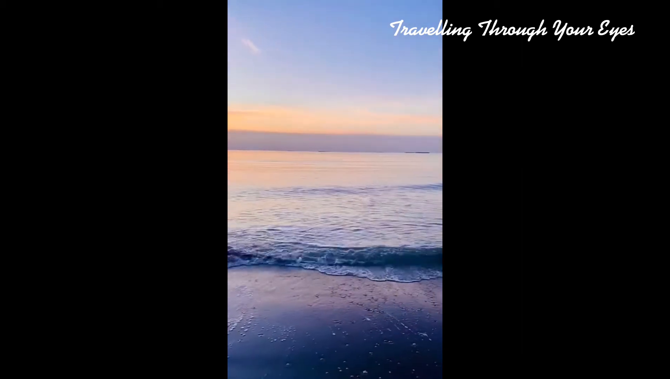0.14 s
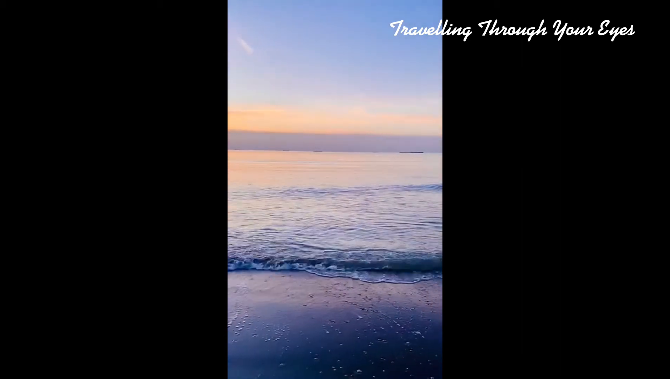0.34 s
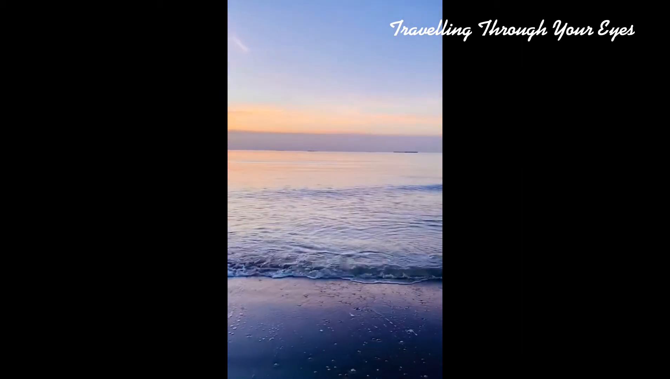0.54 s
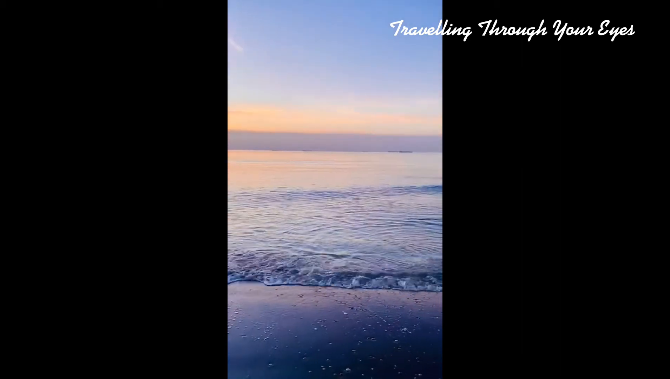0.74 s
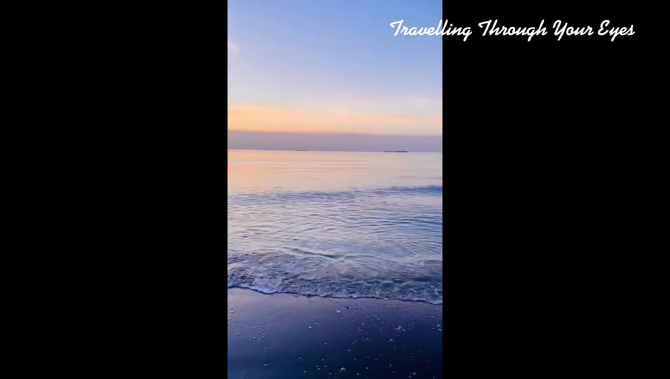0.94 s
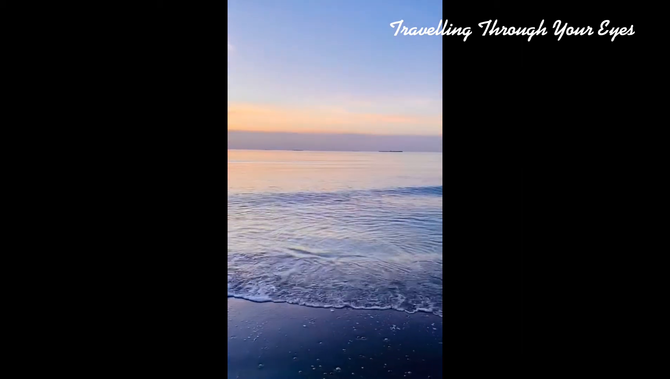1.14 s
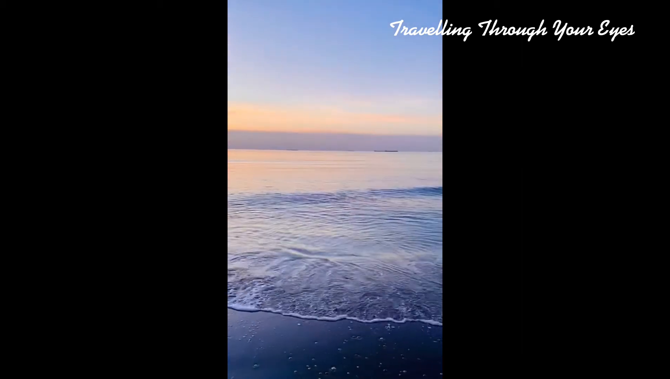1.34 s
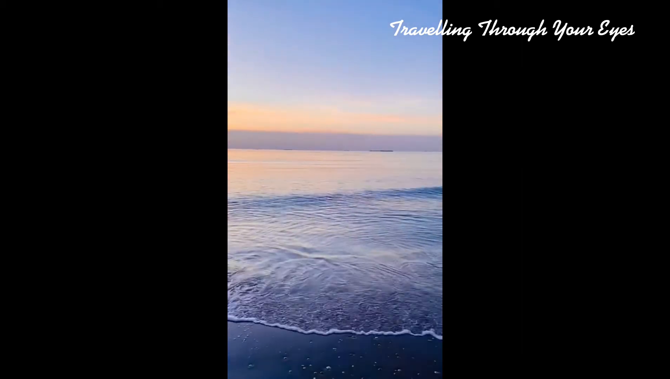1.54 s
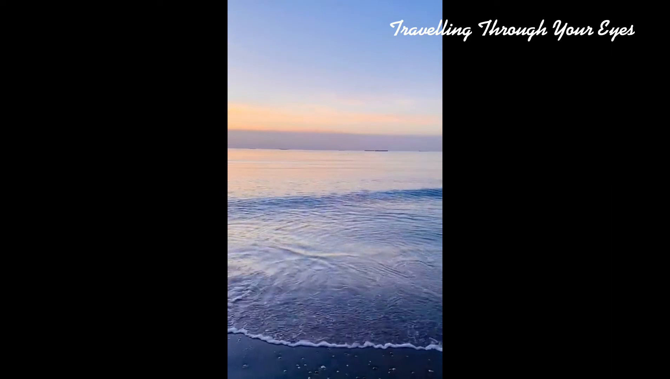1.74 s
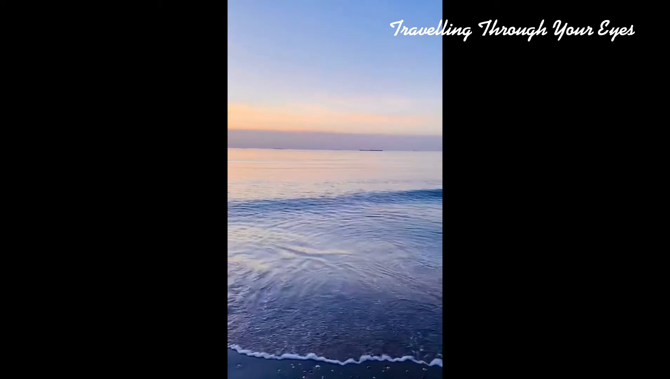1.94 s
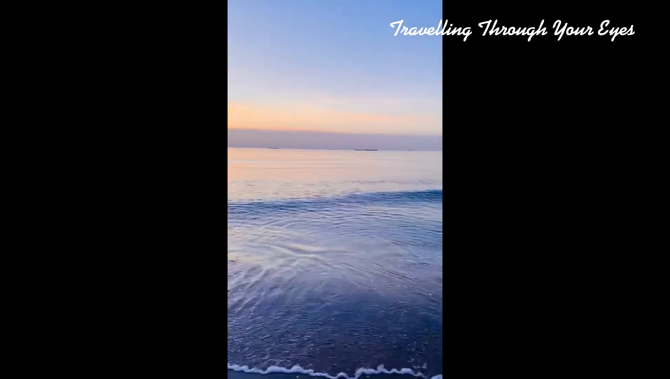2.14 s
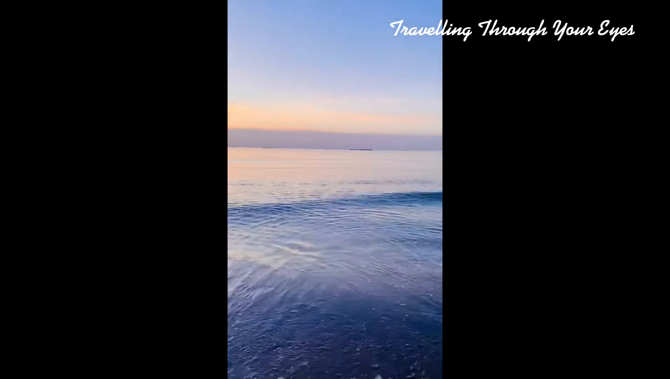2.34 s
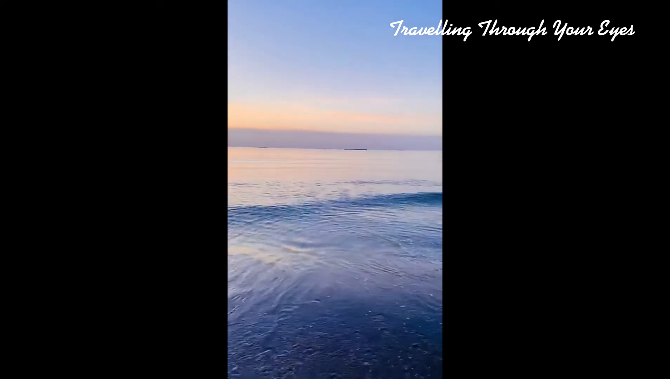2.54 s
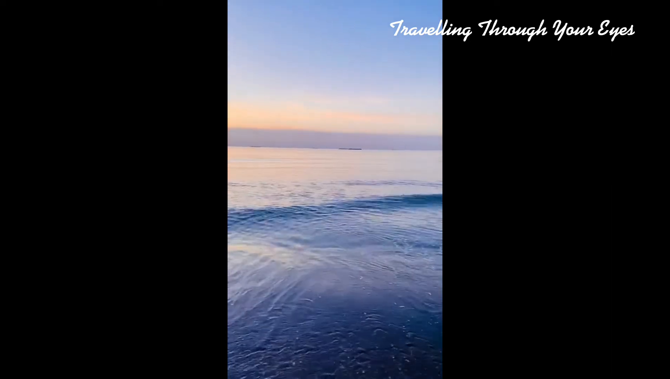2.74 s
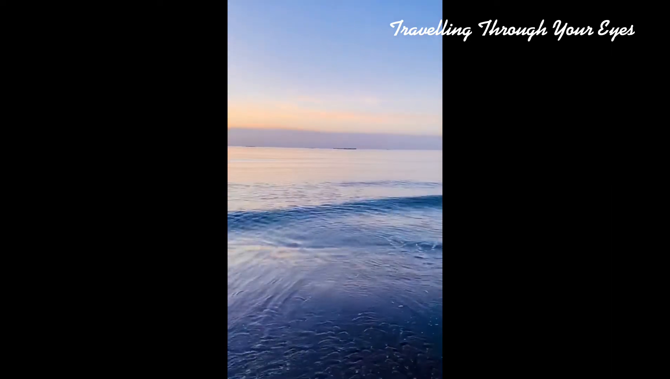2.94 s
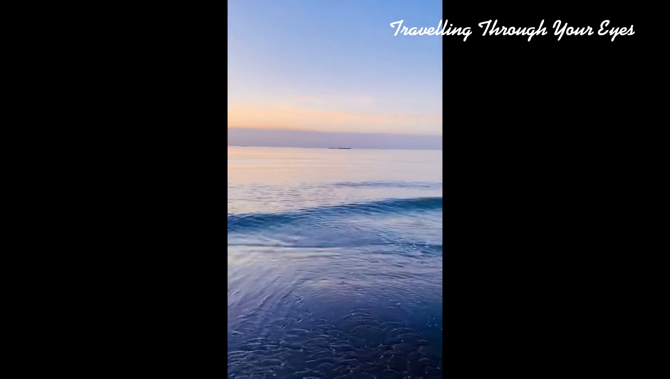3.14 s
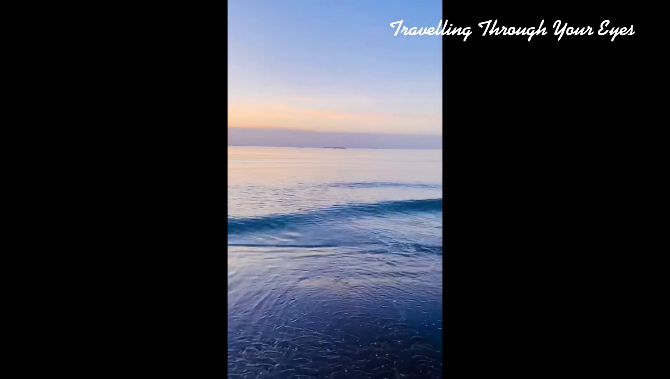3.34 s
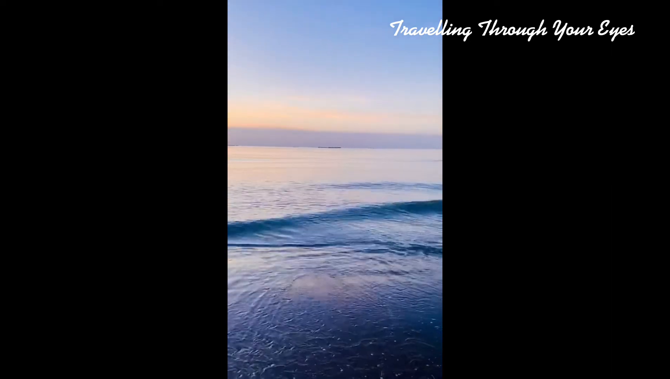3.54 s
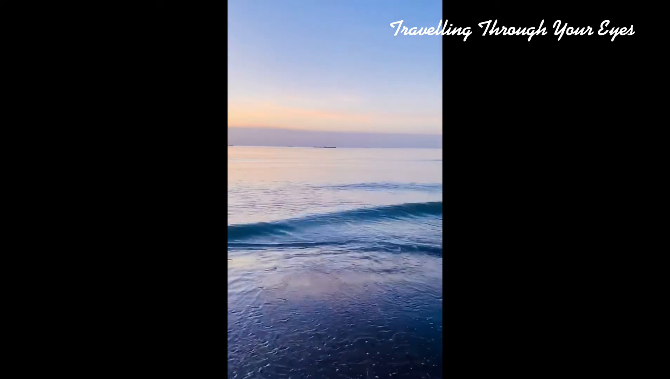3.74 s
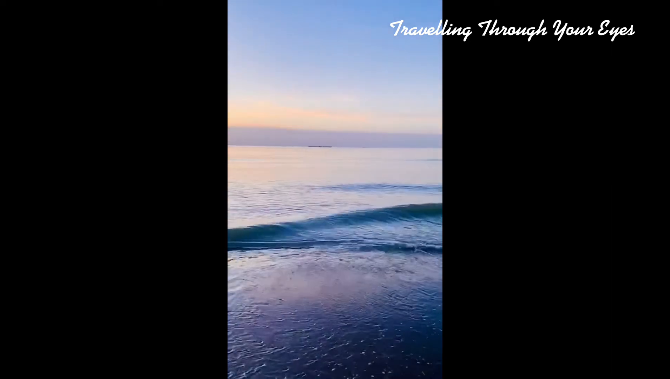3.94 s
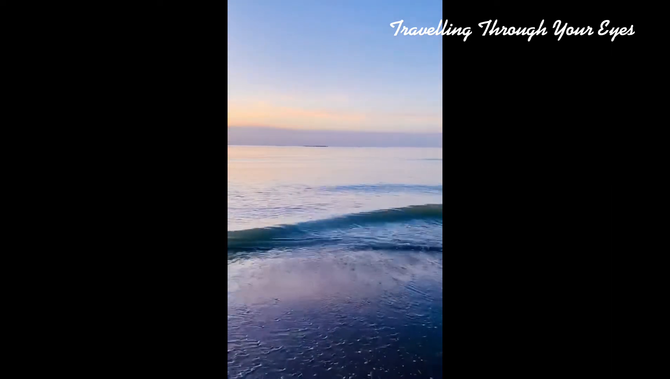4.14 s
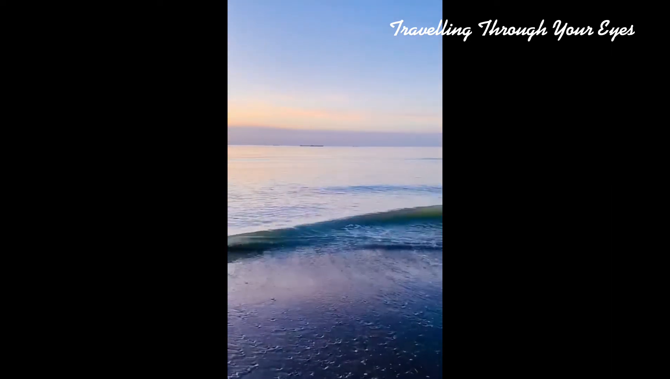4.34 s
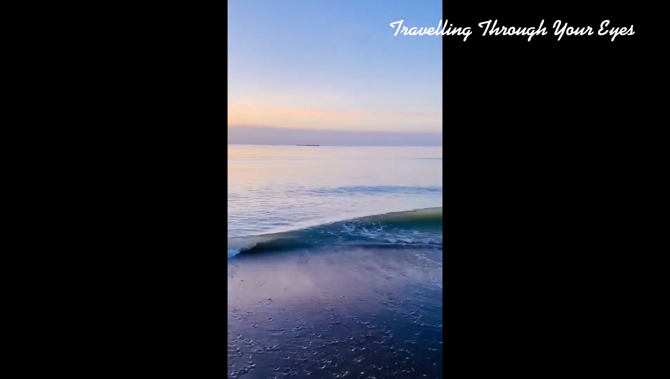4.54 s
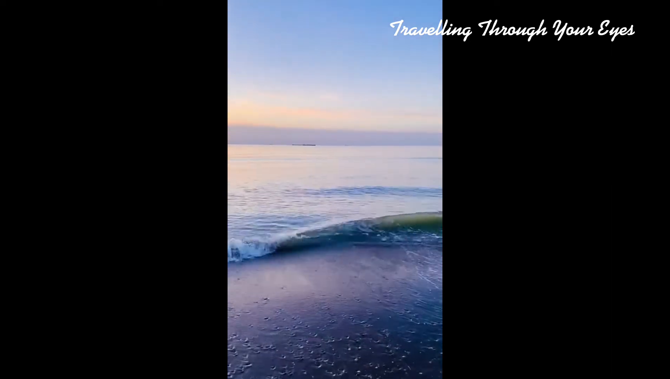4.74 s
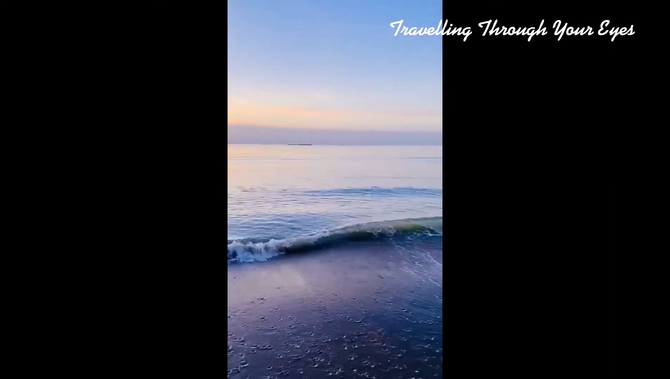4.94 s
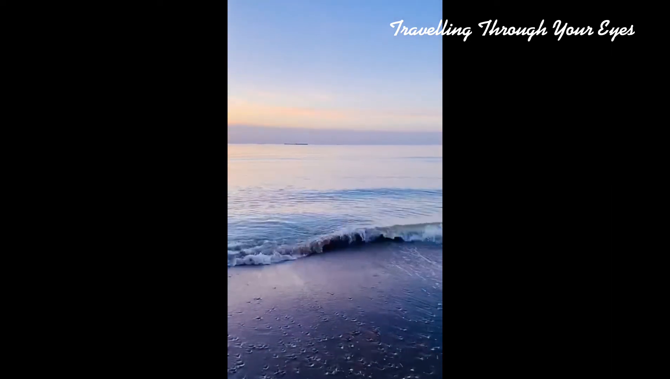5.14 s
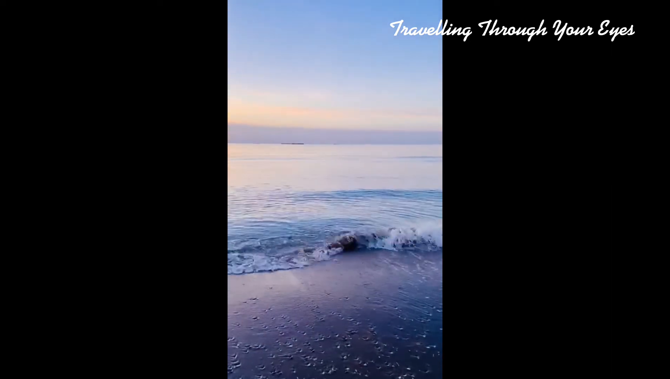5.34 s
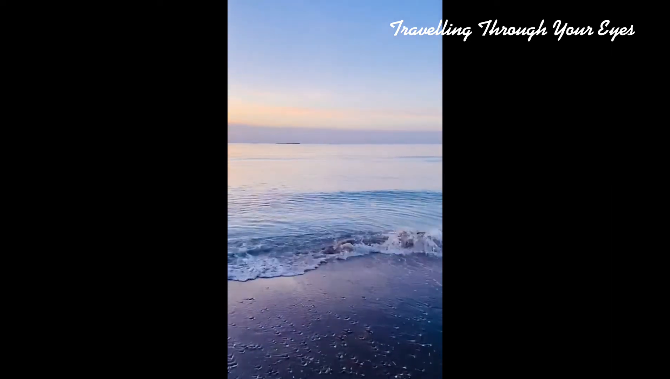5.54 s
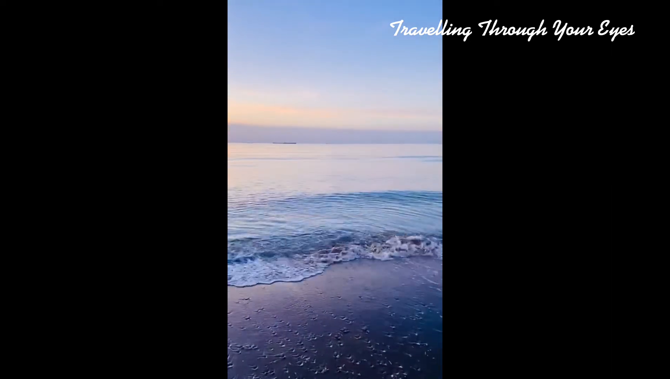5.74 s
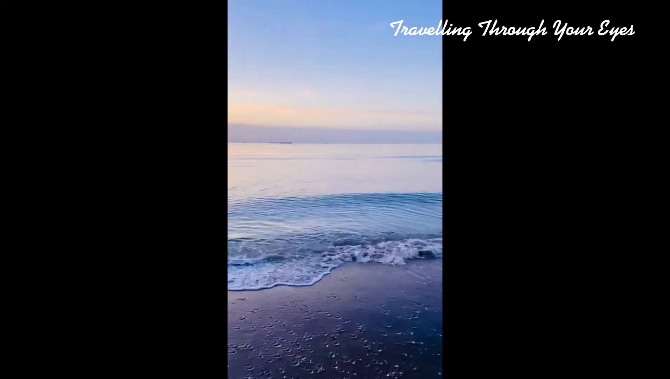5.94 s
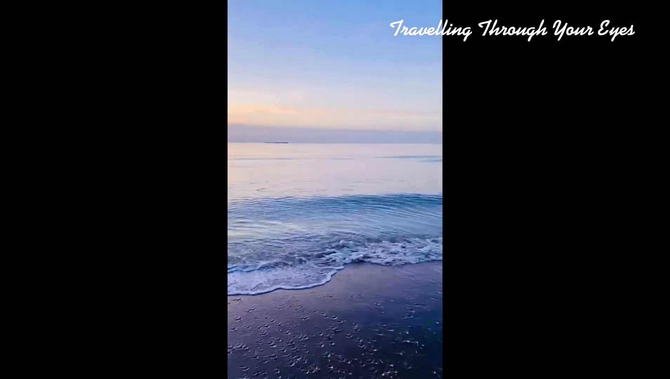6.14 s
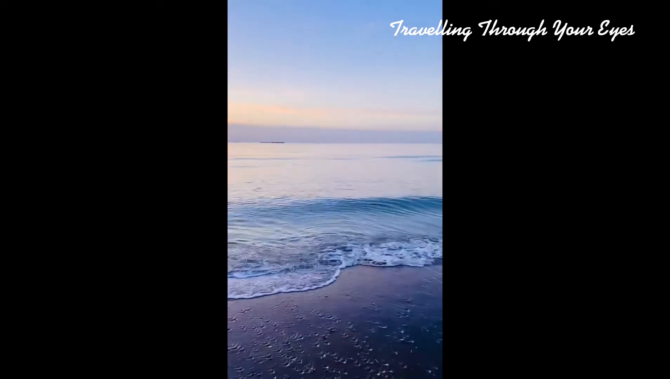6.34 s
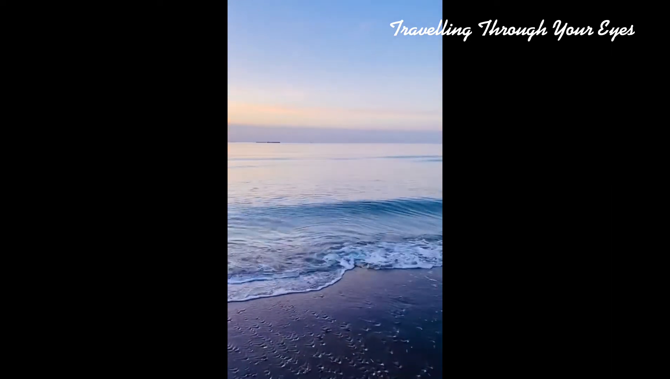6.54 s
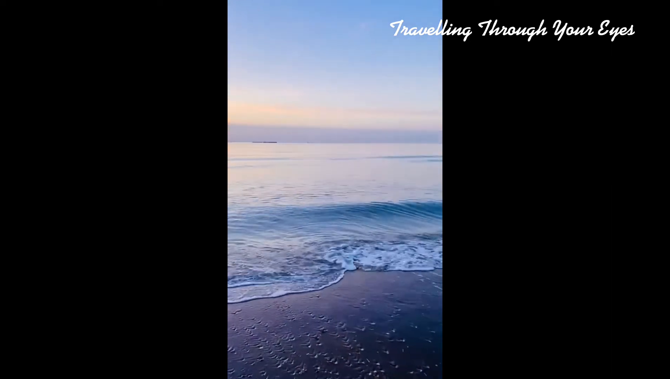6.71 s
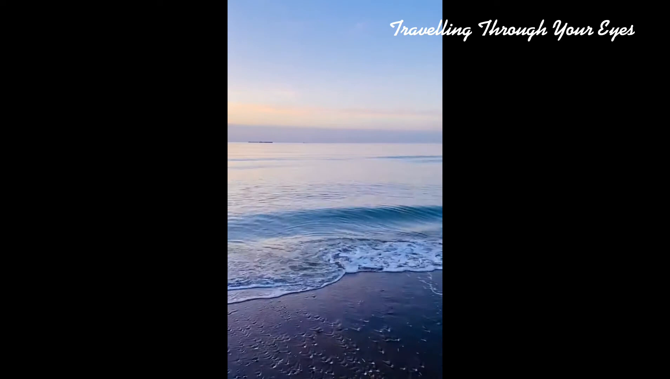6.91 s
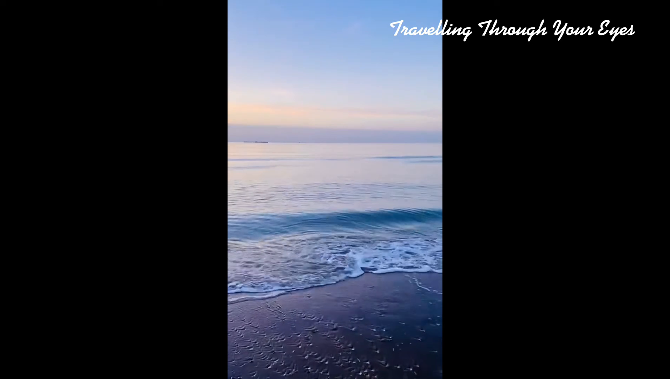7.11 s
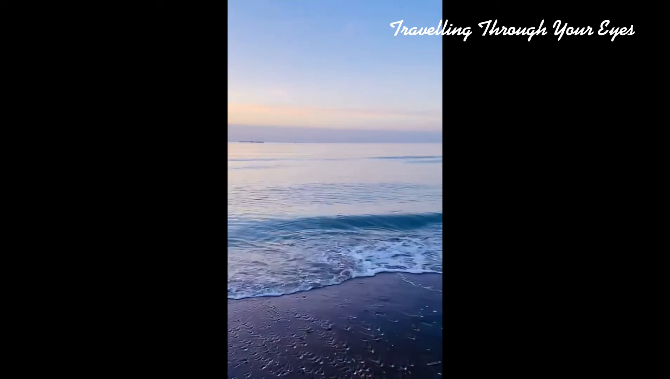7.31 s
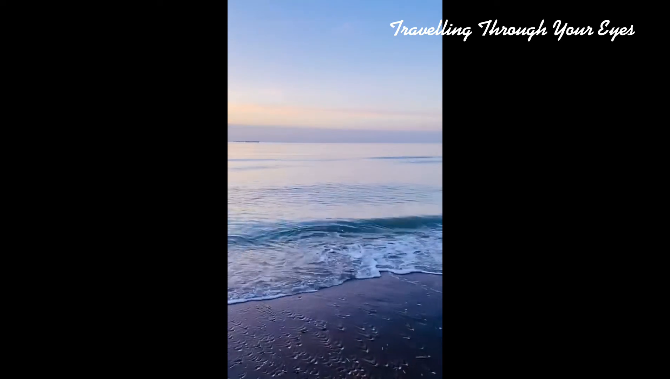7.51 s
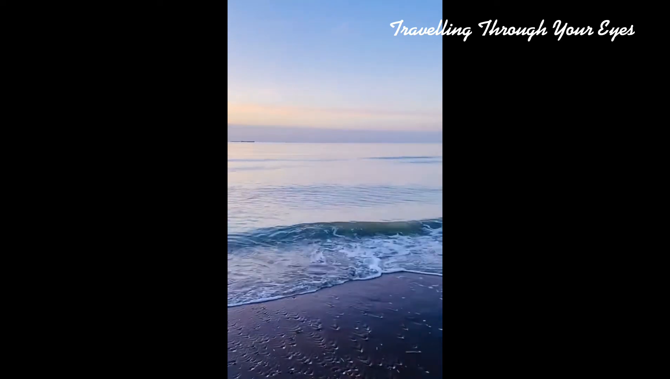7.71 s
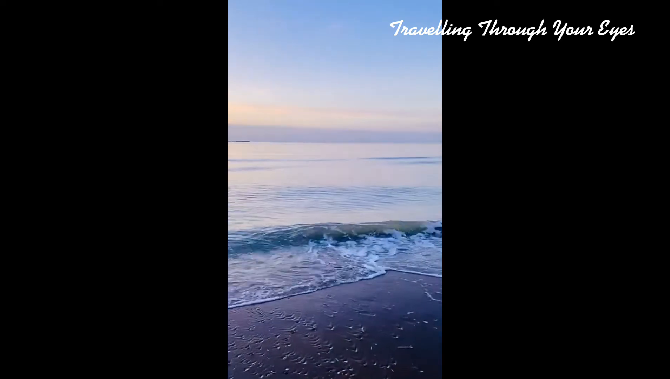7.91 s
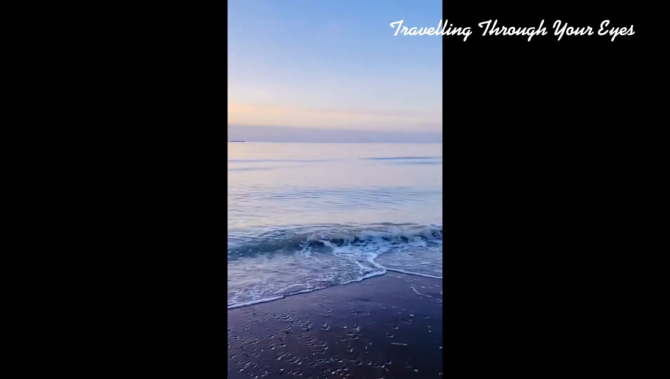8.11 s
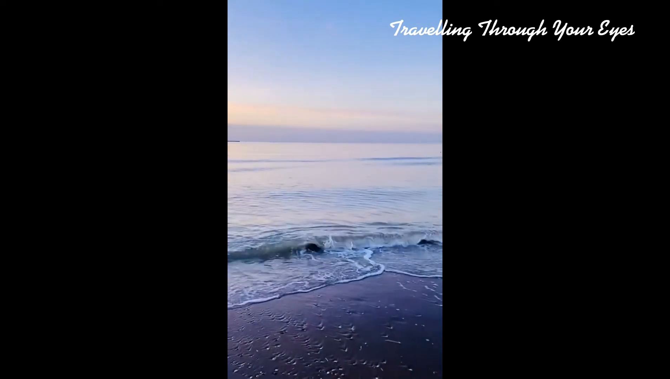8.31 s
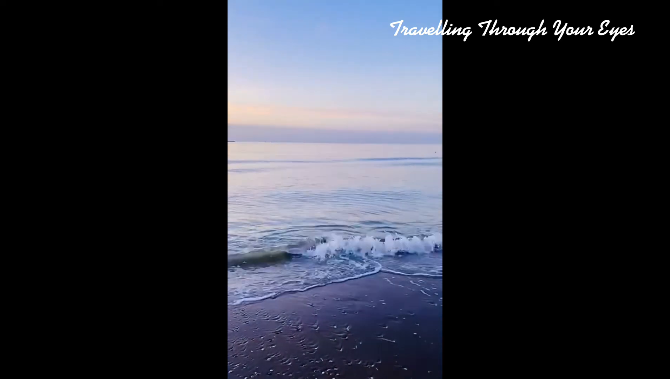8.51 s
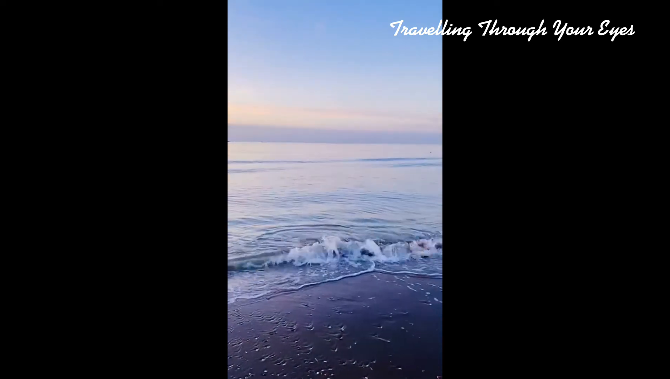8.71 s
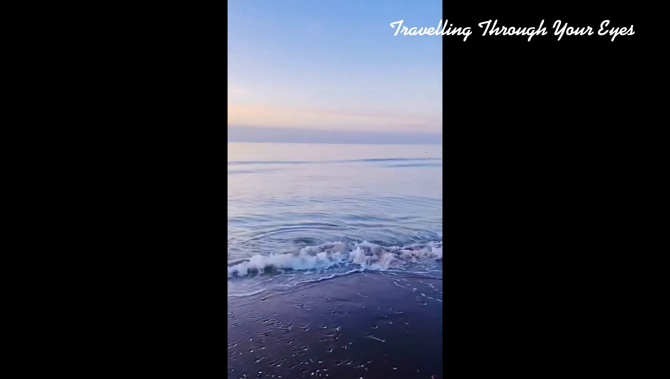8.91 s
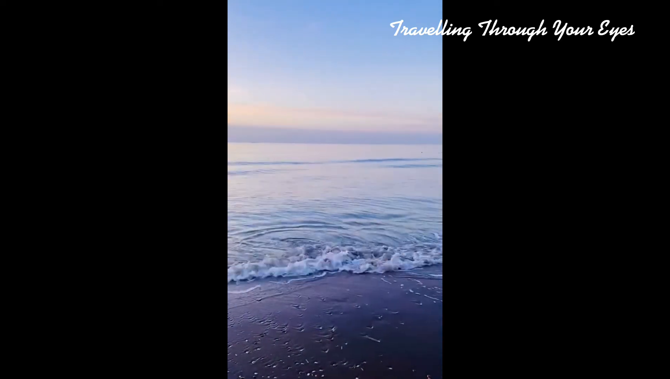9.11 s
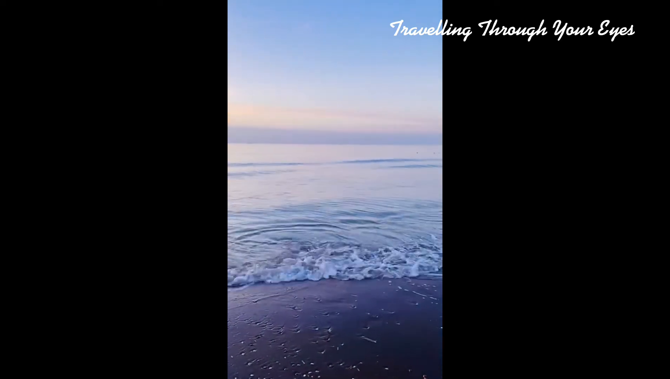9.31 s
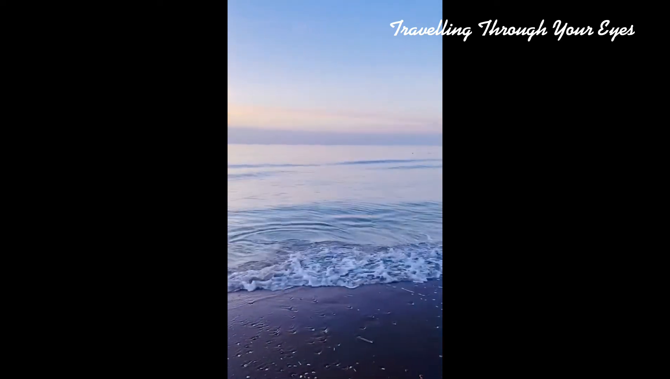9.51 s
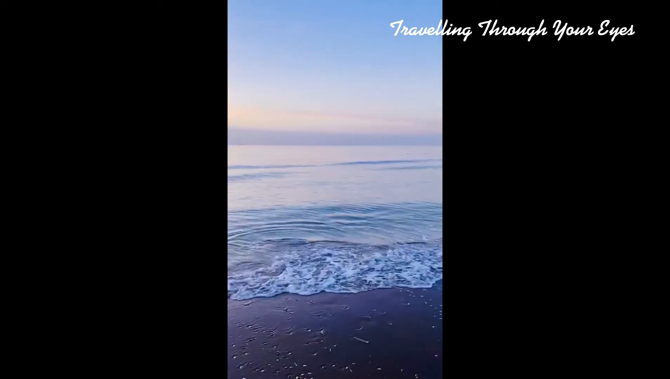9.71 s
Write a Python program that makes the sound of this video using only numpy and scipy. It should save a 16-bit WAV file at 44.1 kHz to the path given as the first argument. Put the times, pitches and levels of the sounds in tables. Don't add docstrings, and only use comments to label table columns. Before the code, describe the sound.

Small sea waves break and wash up a sandy beach, with low roar, bubbling splash, fizzing foam and faint distant shorebird whistles.

```python
import sys
import numpy as np
from scipy import signal
from scipy.fft import rfft, irfft, dct, next_fast_len
from scipy.io import wavfile
from scipy.ndimage import uniform_filter1d, map_coordinates

SR = 44100
rng = np.random.default_rng(int(sys.argv[2]) if len(sys.argv) > 2 else 0)


def gain_from_db(level_db):
    decades = np.asarray(level_db, float) / 20
    return 10 ** decades


def bounce(signal):
    frames = np.transpose(np.atleast_2d(signal))
    limited = np.clip(frames, -1, 1)
    pcm = np.round(limited * 32767).astype(np.int16)
    wavfile.write(sys.argv[1], SR, pcm)


N = 434826
TIME = np.arange(N) / SR
HOP, GRID = 1024, 569


def unit(x):
    return x / np.sqrt(np.mean(x ** 2) + 1e-20)


def along(points, hz):
    f, v = np.transpose(points)
    return np.interp(np.log(hz + 1), np.log(f + 1), v)


def curves(rows):
    s, *cols = np.transpose(rows)
    return [np.interp(TIME, s, c) for c in cols]


def wobble(rate):
    knots = rng.standard_normal(int(N * 60 / SR) + 4)
    return map_coordinates(knots, [TIME * min(rate, 60)])


def filtered(x, response):
    m = next_fast_len(N + 4096)
    return irfft(rfft(x, m) * response(np.fft.rfftfreq(m, 1 / SR)), m)[..., :N]


def bubbles(s, size, hz, cycles, rise, length):
    t = np.arange(length) / SR
    age = t * (hz / cycles)[:, None]
    turns = hz[:, None] * t * (1 + rise * np.minimum(age, 2) / 2)
    envelope = 2 * (1 - np.exp(-8 * age)) * np.exp(-2 * age)
    wave = size[:, None] * np.sin(2 * np.pi * turns) * envelope
    at = (s * SR).astype(int)[:, None] + np.arange(length)
    return np.bincount(at.ravel(), wave.ravel(), N + SR)[:N]


def froth(count, lo_hz, hi_hz, cycles, spread_db, share):
    z = signal.stft(rng.standard_normal((2, N)), nperseg=512)[2]
    field = uniform_filter1d(rng.standard_normal(z.shape[1:]), size=5, axis=0)
    field = uniform_filter1d(field, size=8, axis=1)
    patchy = z * gain_from_db(.7 * unit(field))
    noise = unit(signal.istft(patchy, nperseg=512)[1][:, :N])
    length = int(2 * cycles / lo_hz * SR)
    cloud = []
    for draw in rng.random((2, count, 3)):
        s = draw[:, 0] * N / SR
        hz = lo_hz * (hi_hz / lo_hz) ** draw[:, 1]
        size = hz * gain_from_db(spread_db * np.minimum(-np.log(1 - draw[:, 2]), 3))
        cloud.append(unit(bubbles(s, size, hz, cycles + 0 * hz, 0.3, length)))
    share = np.clip(share, 0, 1)
    return np.sqrt(1 - share) * noise + np.sqrt(share) * np.array(cloud)


def ports(pair, colours, lo_hz, hi_hz, side_db, lead, lean=0):
    # frequency in Hz, share from 0 to 1.
    shadow = [(250, 0.2), (600, 0.45), (1200, 0.96), (1800, 1), (2400, .02)]
    near, other = pair

    def cut(hz):
        return 1 / np.sqrt((1 + (lo_hz / (hz + 1)) ** 6) * (1 + (hz / hi_hz) ** 6))

    in_step = lean * filtered(near, lambda hz: along(shadow, hz))
    ahead = filtered(near, lambda hz: 1j + 0 * hz)
    out_of_step = lead * ahead + np.sqrt(abs(1 - lead ** 2)) * other
    apart = in_step + np.sqrt(1 - .75 * lean ** 2) * out_of_step
    both = filtered(near, lambda hz: gain_from_db(along(colours[0], hz)) * cut(hz))
    side = filtered(apart, lambda hz: gain_from_db(along(colours[1], hz)) * cut(hz))
    return np.array([unit(both), gain_from_db(side_db) * unit(side)])


def whistle(rows, side_db):
    hz, db = curves(rows)
    edge = np.clip(np.minimum(TIME - rows[0][0], rows[-1][0] - TIME) / 0.013, 0, 1)
    phase = 2 * np.pi * np.cumsum(uniform_filter1d(hz, size=700)) / SR
    size = np.sqrt(2) * edge * gain_from_db(db + wobble(30))
    return size * np.array([np.sin(phase), gain_from_db(side_db) * np.cos(phase - .4)])


def shorebirds():
    # time in seconds, pitch in Hz, level in dB.
    calls = [
        [(7.31, 1760, -57), (7.35, 2330, -52), (7.39, 2690, -58), (7.43, 2680, -61), (7.48, 2480, -52),
         (7.55, 2450, -54), (7.65, 2190, -65), (7.745, 2310, -50), (7.8, 1990, -53)],
        [(7.87, 2200, -58), (7.9, 2450, -56), (7.93, 2560, -59), (7.975, 2330, -54), (8.02, 2020, -55),
         (8.055, 2120, -56), (8.11, 2350, -66)],
    ]
    # time in seconds, pitch in Hz, level in dB.
    far_call = [
        (9.6, 1843, -68),
        (9.7, 1796, -58),
        (9.78, 1890, -58),
        (9.87, 1910, -58),
    ]
    return sum(whistle(rows, side_db=7.0) for rows in calls) + whistle(far_call, side_db=-9)


def pockets():
    # start in seconds, peak in dB, pitch in Hz, decay in cycles.
    plops = [(0.232, -16, 1040, 3.5), (0.367, -11, 1120, 3.3), (2.716, -35, 675, 4.8),
             (4.773, -16, 885, 9.3), (4.852, -14.5, 1320, 1.9), (4.86, -23, 980, 5.9),
             (4.904, -18, 490, 2.2), (6.355, -35, 426, 4.3), (7.313, -29, 580, 5.6), (7.666, -39, 1500, 8),
             (8.365, -30, 485, 6.2), (8.619, -25, 1150, 9.2), (8.79, -21.5, 656, 13),
             (9.236, -27, 790, 3.3), (9.563, -42, 1240, 10)]
    # start in seconds, peak in dB, pitch in Hz, decay in cycles.
    slaps = [(0.271, -24, 111, 2.5), (.372, -26, 80.5, 3), (0.611, -24, 98, 3), (4.291, -24.5, 107, 4.4),
             (4.5, -25.5, 204, 5.1), (4.6, -24.5, 189, 6.3), (5.09, -20.5, 227, 5.5), (5.2, -23, 105, 3.7),
             (5.471, -36, 256, 5.5), (8.373, -23, 137, 3), (8.409, -27, 90, 5.4), (8.467, -20, 72, 3.4),
             (8.695, -26.5, 187, 8.1)]

    def ring(rows, rise):
        s, peak_db, hz, cycles = np.transpose(rows)
        return bubbles(s, gain_from_db(peak_db), hz, cycles, rise, SR // 5)

    return ring(plops, 0.014) * np.array([[1], [.55]]) + ring(slaps, 0.05) * np.array([[1], [0]])


def splashes():
    # time in seconds, lift in dB, depth from 0 (bright) to 1 (deep).
    hits = [(0.368, 4.5, 0.83), (0.536, 4, 0.78), (.612, 0.5, 0.97), (2.1, 2, 0.14), (2.715, -0.5, .3),
            (2.84, 1.5, 0.47), (3.662, 2.5, .1), (4.0, 3, .7), (4.3, 1, 1), (4.45, -0.5, .9),
            (4.772, 3.5, 0.3), (5.13, -1.5, 0.6), (5.24, 2, 0.25), (5.478, 3.5, 0.92), (6.058, 4, 0.72),
            (6.298, 6, 0.76), (6.66, 2, 0.21), (7.57, 0, 0.23), (8.373, 6.5, 0.69), (8.468, 2, .9),
            (8.705, 4.5, 0.85), (8.8, 5, 0.99), (9.079, 3.5, 0.13), (9.13, 5, 0.78)]
    rise_s, fall_s = 0.0061, 0.025
    s, lift_db, depth = np.transpose(hits)
    coarse = TIME[::64]
    age = coarse - s[:, None]
    shape = lift_db[:, None] * np.exp(np.where(age < 0, age / rise_s, -age / fall_s))
    deep = np.clip(depth, 0, 1)
    bright = 1 - deep
    return [np.interp(TIME, coarse, 2 * share @ shape) for share in (deep, bright)]


def tide():
    # time in seconds, strength in dB.
    breakers = [
        [(0.0, -34.5), (0.11, -32.5), (0.3, -29), (0.65, -29.5), (0.9, -35), (1.12, -40), (1.3, -45),
         (1.9, -64.5)],
        [(3.2, -82), (3.7, -47), (3.95, -41), (4.3, -31), (4.6, -29.5), (5.25, -27.5), (5.72, -30.5),
         (5.9, -38.5), (6.8, -45), ],
        [(8.2, -49.5), (8.35, -42.5), (8.385, -34), (8.6, -34), (8.8, -29), (9.0, -34.5), (9.12, -37),
         (9.25, -39.5), (9.55, -50.5)],
    ]
    leans = [
        0.49,
        1,
        0.7,
    ]
    # time in seconds, strength in dB.
    rollers = [(0, -37), (.9, -34), (1.25, -39), (1.95, -39.5), (2.75, -36.5), (3.0, -38), (3.6, -36.5),
               (3.9, -39), (4.9, -37.5), (5.2, -25), (5.7, -32.5), (6.3, -34), (6.7, -35), (7.2, -35),
               (7.85, -34.5), (8.35, -37), (9.5, -43.5), (9.86, -43)]
    near_roar_db, near_fizz_db, far_wash_db, far_fizz_db = -4.5, -12, -7, -26.5
    foam_db, foam_fade_s, foam_start_db = -25, 1.37, -60
    wave_top_db, foam_top_db = np.array([2, -0.5, -5]), 3

    waves = np.array([gain_from_db(2 * np.interp(TIME, *np.transpose(rows), left=-120, right=-120))
                      for rows in breakers])
    near, far = waves.sum(axis=0), gain_from_db(2 * curves(rollers)[0])
    keep = np.exp(-1 / (foam_fade_s * SR))
    foam = signal.lfilter([1 - keep], [1, -keep], near * gain_from_db(2 * foam_db), zi=[gain_from_db(2 * foam_start_db)])[0]
    deep_db, bright_db = splashes()
    roar = far + near * gain_from_db(2 * near_roar_db)
    wash = near + far * gain_from_db(2 * far_wash_db)
    fizz = near * gain_from_db(2 * near_fizz_db) + far * gain_from_db(2 * far_fizz_db) + foam
    roar_db = 10 * np.log10(roar) + deep_db
    wash_db = 10 * np.log10(wash) + bright_db
    fizz_db = 10 * np.log10(fizz) + bright_db
    lean = np.array(leans) @ waves / wash
    top_db = foam_top_db + (wave_top_db - foam_top_db) @ waves / wash
    return roar_db, wash_db, fizz_db, lean, top_db


def surf():
    # frequency in Hz, density in dB per Hz.
    body = [
        [(13, -45), (22, -25), (65, 3.5), (135, -0.5), (200, 1), (671, -2.5), (1390, -7.5), (1940, -12.5), (2440, -23.5), (2770, -13), (3200, -24.5), (4160, -56), (7040, -120)],
        [(59, -78), (100, -74), (174, -24), (219, -14), (348, -6), (479, -3.5), (678, -0.5), (893, -3), (1230, -6), (1790, -17), (2610, -13), (3200, -5.5), (4160, -74), (7040, -120)],
    ]
    mist = [
        [(1200, -1), (1900, 4), (2700, -5.5), (3400, -8.5), (4000, -8), (4400, -11.5), (4800, -17), (5100, -8), (5600, -47)],
        [(1060, -31), (1800, -1.5), (2630, 0), (3870, -4.5), (4760, -6.5), (5130, -12.5), (5350, -25), (7150, -20), (12100, -120)],
    ]
    fine = [
        [(4000, -31), (4980, -34.5), (5250, 2.5), (7100, -2), (8600, -4), (9700, -6.5), (10600, -10.5), (11500, -14.5), (13000, -50)],
        [(4000, -50), (5100, 1.5), (5300, -22), (6000, -17), (6600, -8), (7200, -3.5), (8300, 0.5), (10800, -1), (11800, -1.5), (13000, -43)],
    ]
    # time in seconds, place from 0 (ahead) to 1 (far aside).
    off_axis = [(0, 0.15), (.8, 0.1), (1.1, 0.057), (2.65, 0.13), (2.78, 0.39), (3.9, 0.98), (4.5, .72),
                (4.85, 0.49), (5.6, 0.21), (6.2, 0), (7.0, 0), (7.45, 0.54), (8.2, 0.78), (8.36, 0.4),
                (9.2, 0.44), (9.86, 0.057)]
    spray_over_fizz_db, aside_side_db, aside_centre_db = 5.5, 8.5, -16
    aside_lean, aside_body_db = 0.6, 8.5
    top_hz = 7600
    shade_hz, low_shade = 3780, 0.81

    roar_db, wash_db, fizz_db, lean, top_db = tide()
    aside, = curves(off_axis)
    spray_db = fizz_db + spray_over_fizz_db + aside_side_db * aside
    lean = np.clip(lean + aside_lean * aside, -.98, .98)
    splash = 0.19 * wobble(9) + 1.3 * wobble(25)

    swell = ports(rng.standard_normal((2, N)), body, 15, 55, side_db=-55, lead=.1)
    roar = froth(count=2500, lo_hz=90, hi_hz=468.4, cycles=3.06, spread_db=2.5, share=0.02)
    roar = ports(roar, body, 61, 570, side_db=-13.0, lead=0.13, lean=lean)
    wash = froth(count=9000, lo_hz=331.6, hi_hz=2745, cycles=4.06, spread_db=-1, share=0.071)
    wash = ports(wash, body, 425, 2390, side_db=-1.5, lead=0.56, lean=lean)
    spray = froth(count=15000, lo_hz=1947, hi_hz=5380, cycles=2.77, spread_db=3.5, share=0.19)
    spray = ports(spray, mist, 2050, 13000, side_db=-0.5, lead=0.71)
    fizz = froth(count=25000, lo_hz=4810, hi_hz=11700, cycles=5.7, spread_db=10.0, share=0.083)
    fizz = ports(fizz, fine, 1500, 23000, side_db=-1.0, lead=.55)

    finest = filtered(fizz, lambda hz: 1 / (1 + (top_hz / (hz + 1)) ** 8))
    fizz = fizz + (gain_from_db(top_db) - 1) * finest
    wide = gain_from_db(np.array([[0], [aside_body_db]]) * (aside - .5))
    roar, wash = wide * roar, wide * wash
    low = filtered(spray[0], lambda hz: 1 / (1 + (hz / shade_hz) ** 6))
    centre_db = aside_centre_db * aside
    spray[0] = gain_from_db(centre_db) * (spray[0] - low) + gain_from_db(low_shade * centre_db) * low

    wash_db = wash_db + 0.59 * splash + 0.22 * wobble(17)
    spray_db = spray_db + 0.76 * splash + 0.76 * wobble(12)
    fizz_db = fizz_db + 0.36 * splash + 0.34 * wobble(17)
    return (gain_from_db(-48.0) * swell + gain_from_db(roar_db) * roar + gain_from_db(wash_db) * wash
            + gain_from_db(spray_db) * spray + gain_from_db(fizz_db) * fizz)


def scene():
    both, side = shorebirds() + pockets() + surf()
    return np.array([both + side, both - side])


def lapped(x):
    padded = np.pad(x, ((0, 0), (2 * HOP - GRID, 2 * HOP + (GRID - N) % HOP)))
    blocks = padded.reshape(len(x), -1, HOP)
    window = np.sin(np.pi * (np.arange(2 * HOP) + .5) / (2 * HOP))
    frames = np.concatenate([blocks[:, :-1], blocks[:, 1:]], axis=2) * window
    a, b, c, d = np.split(frames, 4, axis=2)
    folded = np.concatenate([-c[..., ::-1] - d, a - b[..., ::-1]], axis=2)
    return dct(folded, type=4, norm="ortho")


def unlapped(lines):
    p, q = np.split(dct(lines, type=4, norm="ortho"), 2, axis=2)
    window = np.sin(np.pi * (np.arange(2 * HOP) + .5) / (2 * HOP))
    frames = np.concatenate([q, -q[..., ::-1], -p[..., ::-1], -p], axis=2) * window
    joined = frames[:, 1:, :HOP] + frames[:, :-1, HOP:]
    return joined.reshape(len(lines), -1)[:, HOP - GRID:][:, :N]


def thinned(dry):
    # frequency in Hz, threshold against the louder signal in dB.
    threshold = [(300, -24), (1300, -19), (2000, -14), (2600, -12.5), (3800, -11), (5000, -8), (6000, -8.5),
                 (8500, -7.5), (10000, -5)]
    lines = lapped(np.array([dry[0] + dry[1], dry[0] - dry[1]]) / 2)
    bands = lines.reshape(2, -1, HOP // 16, 16)
    level = np.sqrt(uniform_filter1d(np.mean(bands ** 2, axis=3), size=3, axis=2))
    louder = level.max(axis=0)
    hz = (np.arange(HOP // 16) + .5) * 8 * SR / HOP
    drift = uniform_filter1d(rng.standard_normal(level.shape), 2, 1)
    drift = unit(uniform_filter1d(drift, 2, 2))
    raised_db = 7 * (level < louder) + 2.3 * drift
    floor = louder * gain_from_db(along(threshold, hz) + raised_db)
    kept = bands * (abs(bands) > floor[..., None])
    both, side = unlapped(kept.reshape(lines.shape))
    return np.array([both + side, both - side])


def low_pass(x):
    return signal.sosfilt(signal.butter(12, 11840, fs=SR, output="sos"), x)


def record(dry):
    mix = thinned(dry)
    return low_pass(mix)


dry = scene()
out = record(dry)
bounce(out)
```